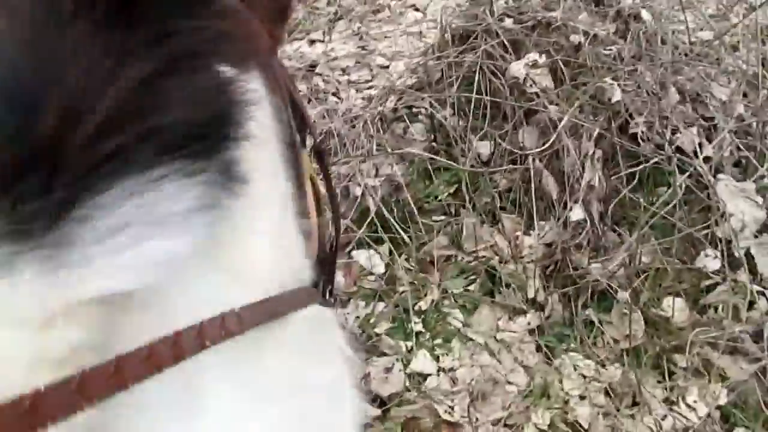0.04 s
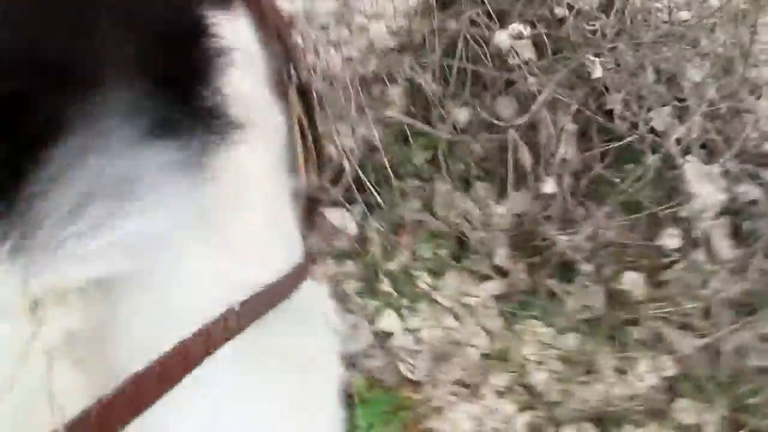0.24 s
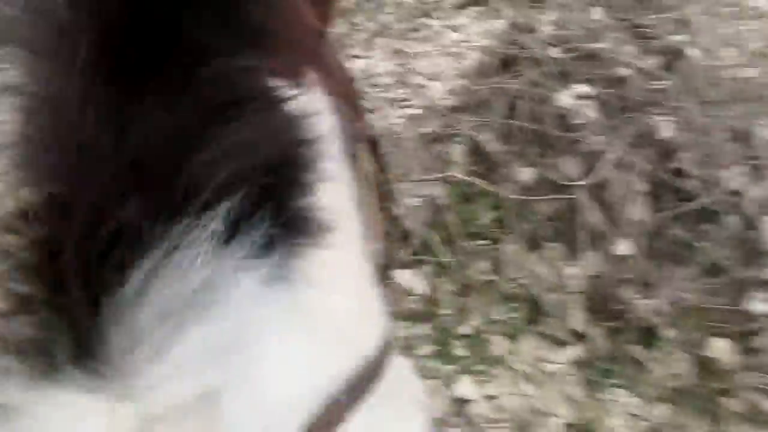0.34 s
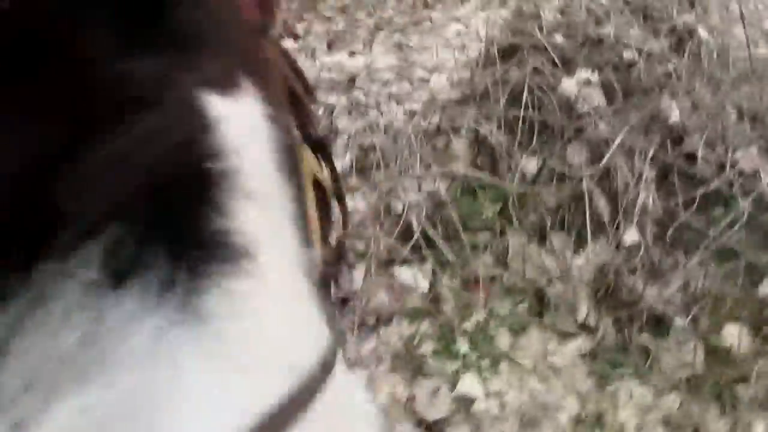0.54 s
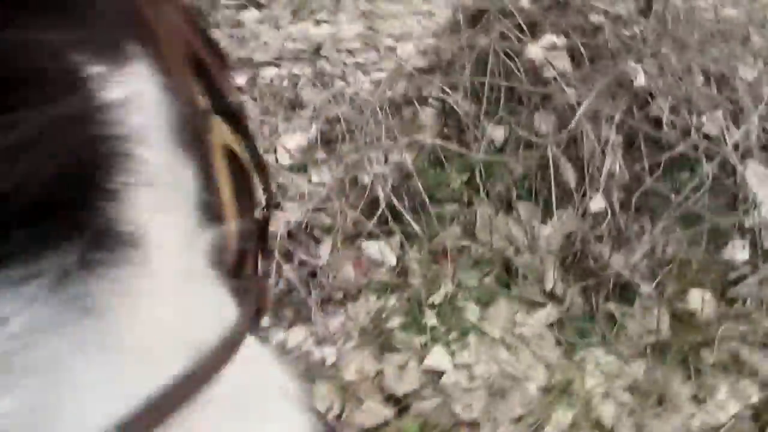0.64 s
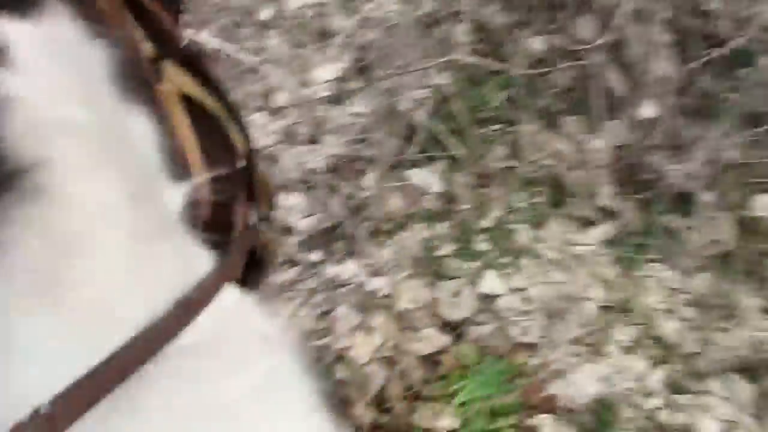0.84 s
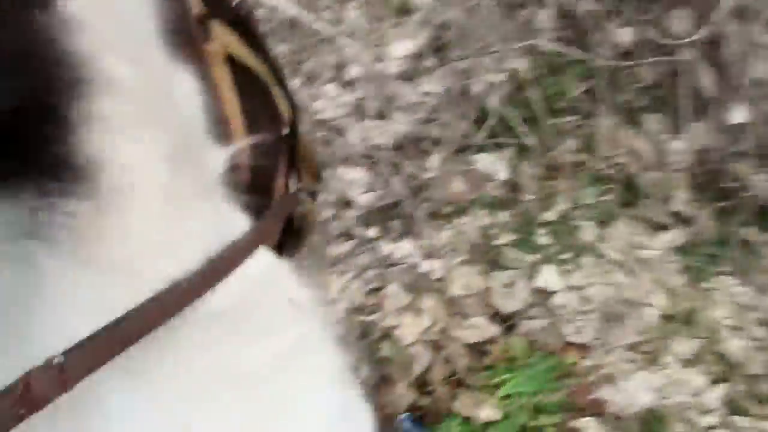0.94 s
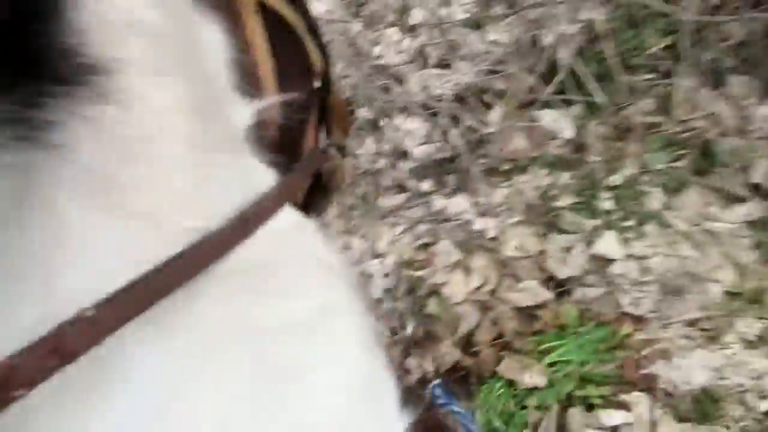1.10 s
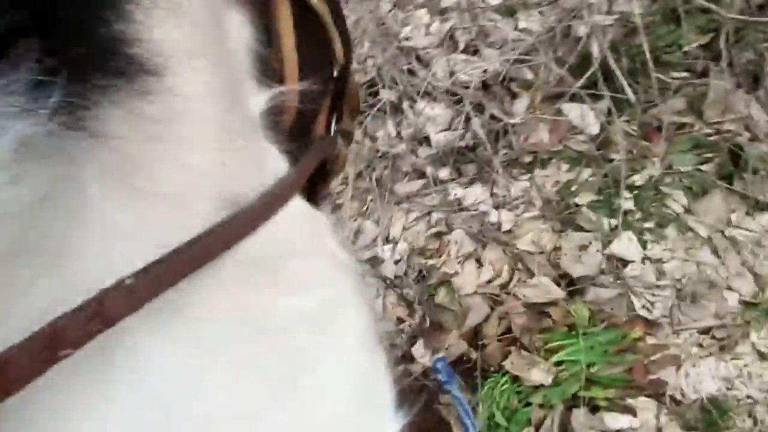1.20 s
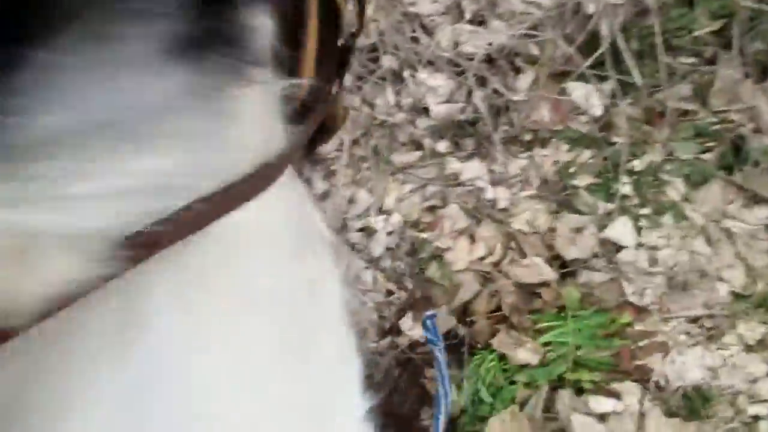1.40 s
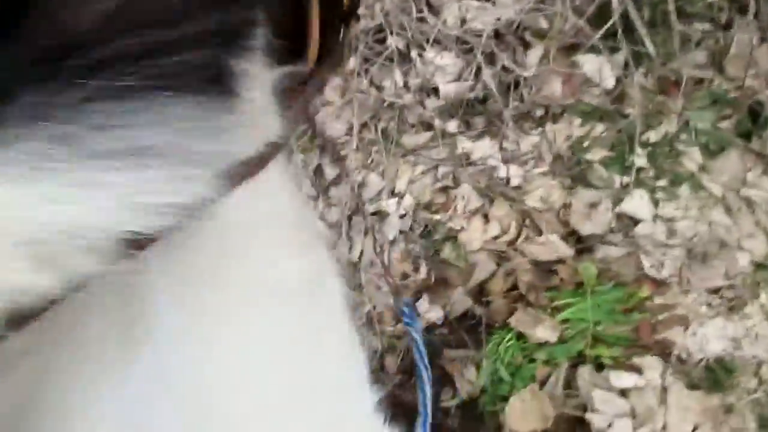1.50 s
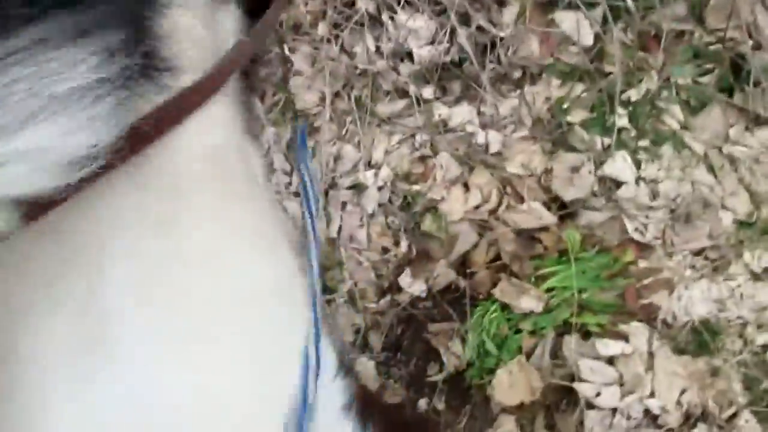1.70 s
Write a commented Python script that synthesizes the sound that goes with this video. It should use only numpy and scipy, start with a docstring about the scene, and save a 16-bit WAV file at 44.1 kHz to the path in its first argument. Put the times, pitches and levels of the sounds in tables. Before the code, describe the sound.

A horse paws at dry leaves and twigs, scraping and then stamping with a crunch.

```python
"""Horse pawing dry leaves

Heard from the saddle: twigs snap, the hoof drags through the litter, then stamps with a crunch and thud.
Dense clicks make the leaves and soil, ringing bursts the wood, damped low tones the blows on the ground.
A few soft knocks and a light rustle follow, and the brush scatters the close sounds into a faint tail.
Behind it all lies quiet outdoor air, with one thin, distant bird whistle."""
import sys
import numpy as np
from scipy import signal
from scipy.fft import rfft, irfft, next_fast_len
from scipy.io import wavfile
from scipy.ndimage import uniform_filter1d

SR = 44100
rng = np.random.default_rng(int(sys.argv[2]) if len(sys.argv) > 2 else 0)


def put_to_file(sound):
    """Save the sound as 16-bit audio at rate SR, in the file named by the first command-line argument."""
    columns = np.atleast_2d(sound).T  # one column per channel
    safe = np.clip(columns, -1, 1)
    whole_steps = np.round(safe * 32767)
    wavfile.write(sys.argv[1], SR, whole_steps.astype(np.int16))


N = 77175
TIME = np.arange(N) / SR

# Level rides for the horse's three moves: time_s, leaf_db, ground_db
HOOF_DRAG = [(.0575, -55, -56), (.0595, -35, -35), (.092, -27, -33.5), (.106, -36, -44), (.128, -39, -40),
             (.16, -32, -37), (.178, -21.5, -29), (.2, -27.5, -37.5), (.214, -23.5, -31),
             (.246, -27.5, -34), (.254, -25, -30), (.267, -26.5, -37), (.275, -22.5, -28),
             (.297, -24, -30.5), (.311, -32.5, -37), (.382, -40, -43.5), (.44, -38.5, -40.5),
             (.472, -33, -36.5), (.494, -38.5, -47), (.53, -37.5, -42.5), (.545, -47.5, -43),
             (.64, -57, -59)]
HOOF_STAMP = [(.70, -53, -55), (.726, -45, -46), (.739, -38, -30), (.742, -30.5, -30), (.76, -30.5, -28),
              (.768, -32, -32), (.783, -32, -28.5), (.81, -40, -42.5), (.85, -48, -47), (.93, -52.5, -53.5),
              (1.02, -66, -63)]
WEIGHT_SHIFT = [(1.078, -76, -73), (1.095, -79, -47.5), (1.15, -69, -63.5), (1.2, -53.5, -55.5),
                (1.29, -72, -64), (1.37, -54.5, -54.5), (1.43, -54, -49), (1.52, -46, -52),
                (1.565, -42, -56), (1.6, -45, -46.5), (1.635, -51, -64), (1.657, -53, -46),
                (1.68, -68, -42), (1.705, -56, -53.5), (1.75, -50, -50)]
# EQ curves for each move's leaves and ground, the stalks and the air: frequency_hz, relative_db
DRAG_LEAF_EQ = [(900, -24), (1600, -6.5), (1950, -14), (2250, -8.5), (2550, -2), (4300, -2), (6500, -6),
                (9000, -10), (12000, -13), (15000, -15.5)]
DRAG_GROUND_EQ = [(30, -22), (110, -27.5), (170, -10), (230, -3), (330, -1), (450, -4), (580, 2),
                  (800, -0.5), (1050, -3), (1550, -3.5), (1900, -13), (4000, -20)]
STAMP_LEAF_EQ = [(900, -26), (1800, -9), (2700, -1), (4300, 0), (6500, -5.5), (9000, -9), (12000, -10),
                 (15000, -12)]
STAMP_GROUND_EQ = [(30, -22), (100, -19.5), (250, -5), (600, 1.5), (1000, -3.5), (1500, -6.5), (2200, -9),
                   (4000, -16), (8000, -46)]
SHIFT_LEAF_EQ = [(900, -20), (2000, -7.5), (3000, -3), (4400, -0.5), (5700, -6), (9000, -5.5),
                 (12500, -7.5), (15000, -12)]
SHIFT_GROUND_EQ = [(30, -22), (150, -25), (250, -6), (350, 0), (500, 1.5), (750, 0), (1100, -1), (2000, -6),
                   (3200, -6), (5000, -17)]
STALK_EQ = [(2000, -5), (3500, -5.5), (5000, 1), (9000, -3), (11800, 0.5), (13000, -1), (15000, -4)]
AIR_EQ = [(25, -3.5), (60, -15), (140, -3), (300, -0.5), (560, 1.5), (900, -1.5), (1500, -2.5),
          (2000, -3.5), (3500, -4.5), (5500, -8.5), (8000, -12.5), (15000, -20.5)]
# Dull colour of the brush's tail: frequency_hz, relative_db
BRUSH_EQ = [(100, -15.5), (500, 1.5), (2000, -8.5), (5000, -4), (14000, -6.5)]
# Blows of hoof on ground: start_s, level_db, pitch_hz, t60_s, relative_grit_db
HOOF_THUDS = [(0.058, -50.5, 80, 0.11, 2.5), (0.544, -34, 76, 0.044, -12), (.758, -33, 160, 0.025, -11),
              (0.7696, -14, 270, 0.017, -16), (1.308, -44, 536, 0.054, 3.5),
              (1.3599, -29.5, 518, 0.018, -5)]
# Twigs snapping: start_s, level_db, centre_hz, width_hz, t60_s
TWIG_SNAPS = [(0.0209, -18.5, 6100, 6200, 0.0017), (0.2527, -18.5, 9000, 9000, 0.021),
              (.2765, -13, 7000, 10000, 0.0035), (.523, -36, 8000, 10000, 0.064),
              (.7403, -27, 2500, 4960, 0.0023), (.887, -37.5, 9100, 9000, 0.0069),
              (1.402, -35, 4430, 5000, 0.0054), (1.449, -37.5, 4500, 5000, 0.0043),
              (1.4762, -38, 4500, 4000, 0.01), (0.0367, -25, 2780, 1500, 0.0058)]
# Sticks knocking together: start_s, level_db, pitch_hz
STICK_KNOCKS = [(.0375, -38, 2210), (0.4339, -27.5, 1910), (0.5752, -35.5, 1890), (1.0775, -40, 1160),
                (1.597, -44.5, 2000)]
# Dry stalks brushing past: start_s, level_db, length_s
STALK_SWISHES = [(1.13, -39, 0.013), (1.168, -45, 0.0094)]
# Level rides for the supporting textures: time_s, level_db
STEM_SPLINTER = [(.19, -73), (.25, -42), (.285, -32.5), (.32, -43), (.38, -51), (.45, -50), (.52, -51),
                 (.6, -60)]  # stems splinter as the hoof digs deeper
HOLLOW_RUB = [(1.55, -73), (1.595, -52), (1.63, -53), (1.66, -50), (1.7, -59.5), (1.75, -53.5)]  # a low rub near the end
GRASS_SLIDE = [(1.48, -68), (1.53, -55), (1.565, -47), (1.6, -56), (1.63, -73)]  # dry grass slides past
WEIGHT_RUMBLE = [(.05, -73), (.33, -66), (.43, -74), (.5, -54), (.58, -71), (.78, -60), (.86, -73)]  # low end of the horse's moving weight
# The far bird's whistle: time_s, pitch_hz, level_db
BIRD_WHISTLE = [(.975, 5800, -71), (.99, 5600, -63), (1.03, 5750, -66), (1.06, 6050, -71),
                (1.09, 5580, -59), (1.11, 5450, -67)]

GRAINS_PER_S, GRAIN_SPREAD_DB = 2600, 3.0
FRACTURES_PER_S, FRACTURE_SPREAD_DB, FRACTURE_SHARE = 2800, 1.5, 0.48
THUD_ATTACK_S, THUD_LOW_CUT_HZ, GRIT_WIDTH_RATIO = 0.0019, 59.5, 1.47
STICK_T60_S, STICK_WIDTH_RATIO, STICK_CLICK_DB = 0.02, 0.22, -5.5
BRUSH_DB, BRUSH_T60_S, BRUSH_DELAY_S = -19, 0.58, 0.013
AIR_DB, WHINE_DB, WHINE_HZ = -51.5, -67, 1934
HIGH_CUT_HZ = 15100


def litter(move, leaf_eq, ground_eq):
    """One move of the hoof: bright leaves crackle over the duller scrape of soil and stems."""
    leaves = undb(curve(move, column=1)) * colour(crackle(), leaf_eq)
    ground = undb(curve(move, column=2)) * colour(crackle(), ground_eq)
    return gate(move) * (leaves + ground)


def crackle():
    """Leaf fragments tick, each in its own band, among sharp broadband fractures."""
    edges_hz = np.geomspace(100, 17000, 13)
    ticks = np.zeros(N)
    for low, high in zip(edges_hz, edges_hz[1:]):
        ticks += band(clicks(GRAINS_PER_S, GRAIN_SPREAD_DB), np.sqrt(low * high), high - low, order=2)
    fractures = clicks(FRACTURES_PER_S, FRACTURE_SPREAD_DB)
    return np.sqrt(1 - FRACTURE_SHARE) * unit(ticks) + np.sqrt(FRACTURE_SHARE) * fractures


def thuds():
    """The ground gives under each blow: a quickly damped tone, roughened with grit."""
    out = np.zeros(N)
    for start, db, hz, t60, grit_db in HOOF_THUDS:
        age = np.maximum(TIME - start, 0)
        body = np.sin(2 * np.pi * hz * age)
        grit = unit(band(rng.standard_normal(N), hz, hz * GRIT_WIDTH_RATIO, order=2))
        envelope = 2 * (1 - np.exp(-age / THUD_ATTACK_S)) * decay(start, t60)
        out += undb(db) * envelope * (body + undb(grit_db) * grit)
    return signal.sosfilt(signal.butter(1, THUD_LOW_CUT_HZ, "high", fs=SR, output="sos"), out)


def twigs():
    """Each snap is a short burst of breaking fibres in the twig's resonance."""
    out = np.zeros(N)
    for start, db, hz, width, t60 in TWIG_SNAPS:
        fibres = rng.choice([-1., 1.], N) * decay(start, t60)
        makeup_gain = 1 / np.sqrt(2 * width / SR)
        out += undb(db) * makeup_gain * band(fibres, hz, width)
    return out


def sticks():
    """Dry wood gives a short, rough note with a click of contact."""
    out = np.zeros(N)
    for start, db, hz in STICK_KNOCKS:
        contact = rng.choice([-1., 1.], N)
        note = unit(band(contact, hz, hz * STICK_WIDTH_RATIO, order=2)) * decay(start, STICK_T60_S)
        click = unit(band(contact, hz, hz * 2)) * decay(start, STICK_T60_S / 2)
        out += undb(db) * (note + undb(STICK_CLICK_DB) * click)
    return out


def friction(move, centre_hz, width_hz):
    """Dense catches and slips ring one broad resonance."""
    scrape = unit(band(clicks(GRAINS_PER_S, GRAIN_SPREAD_DB), centre_hz, width_hz, order=2))
    return gate(move) * undb(curve(move, column=1)) * scrape


def stalks():
    """Dry stalks brush past in brief, rounded swells of bright crackle."""
    envelope = np.zeros(N)
    for onset, db, length in STALK_SWISHES:
        position = 2 * (TIME - onset) / length - 1
        envelope += undb(db) * np.sqrt(np.maximum(1 - position ** 2, 0))
    return envelope * colour(crackle(), STALK_EQ)


def rumble():
    """The horse shifts its weight: deep, soft noise under the drag and the stamp."""
    low_end = unit(band(rng.standard_normal(N), centre_hz=50, width_hz=75, order=2))
    return undb(curve(WEIGHT_RUMBLE, column=1)) * low_end


def brush(x):
    """Trunks and undergrowth scatter a faint, duller tail."""
    tail = colour(rng.standard_normal(N), BRUSH_EQ) * decay(BRUSH_DELAY_S, BRUSH_T60_S)
    return undb(BRUSH_DB) * signal.fftconvolve(x, unit(tail) / np.sqrt(2 * N))[:N]


def bird():
    """One thin, far whistle: a gliding sine with a fast flutter in pitch."""
    hz = curve(BIRD_WHISTLE, column=1) * (1 + 0.0073 * waver(rate_hz=170))
    return gate(BIRD_WHISTLE) * undb(curve(BIRD_WHISTLE, column=2)) * tone(hz)


def air():
    """A quiet, even bed of outdoor noise with a faint, thin whine."""
    whine = tone(WHINE_HZ * (1 + 0.00177 * waver(rate_hz=35)))
    return undb(AIR_DB) * colour(rng.standard_normal(N), AIR_EQ) + undb(WHINE_DB) * whine


def undb(db):
    """Decibels to gain."""
    return 10 ** (np.asarray(db) / 20)


def unit(x):
    """Scale to rms 1."""
    return x / np.sqrt(np.mean(x ** 2) + 1e-18)


def curve(table, column):
    """One column of a table, joined by straight lines in time."""
    rows = np.array(table)
    return np.interp(TIME, rows[:, 0], rows[:, column])


def gate(table):
    """Open from a table's first time to its last."""
    return (TIME >= table[0][0]) & (TIME <= table[-1][0])


def decay(start, t60):
    """Hard attack, then a fall of 60 dB every t60 seconds."""
    return (TIME >= start) * np.exp(-np.log(1000) * np.maximum(TIME - start, 0) / t60)


def colour(x, eq):
    """Minimum-phase EQ, so clicks have no pre-ring; rms 1."""
    hz, db = np.array(eq).T
    size = next_fast_len(2 * N)
    bins_hz = np.maximum(np.fft.rfftfreq(size, 1 / SR), 1)
    gain = undb(np.interp(np.log(bins_hz), np.log(hz), db))
    cepstrum = irfft(np.log(gain), size)
    cepstrum[1:size // 2] *= 2
    cepstrum[size // 2 + 1:] = 0
    return unit(irfft(rfft(x, size) * np.exp(rfft(cepstrum)), size)[:N])


def band(x, centre_hz, width_hz, order=1):
    """Band-pass around a geometric centre."""
    low = np.hypot(centre_hz, width_hz / 2) - width_hz / 2
    high = min(low + width_hz, SR * .48)
    return signal.sosfilt(signal.butter(order, [low, high], "band", fs=SR, output="sos"), x)


def clicks(per_s, spread_db):
    """Random clicks, mostly small and a few large; rms 1."""
    hits = rng.random(N) < per_s / SR
    size = np.minimum(rng.exponential(size=N), 4.5)
    sign = rng.choice([-1, 1], N)
    return unit(hits * sign * undb(spread_db * size))


def tone(hz):
    """A sine that follows a pitch curve; rms 1."""
    return np.sqrt(2) * np.sin(2 * np.pi * np.cumsum(hz) / SR)


def waver(rate_hz):
    """Smooth random modulation; rms 1."""
    size = int(SR / rate_hz)
    return unit(uniform_filter1d(uniform_filter1d(rng.standard_normal(N), size), size))


def scene():
    """Mono mix: the close foley feeds the brush; rumble, bird and air stay dry."""
    drag = litter(HOOF_DRAG, DRAG_LEAF_EQ, DRAG_GROUND_EQ)
    stamp = litter(HOOF_STAMP, STAMP_LEAF_EQ, STAMP_GROUND_EQ)
    shift = litter(WEIGHT_SHIFT, SHIFT_LEAF_EQ, SHIFT_GROUND_EQ)
    stems = friction(STEM_SPLINTER, centre_hz=1890, width_hz=500)
    rub = friction(HOLLOW_RUB, centre_hz=349, width_hz=87)
    grass = friction(GRASS_SLIDE, centre_hz=4370, width_hz=900)
    close = drag + stamp + shift + stems + rub + grass + twigs() + sticks() + stalks() + thuds()
    return (close + brush(close) + rumble() + bird() + air())[None]


def record(dry):
    """A steep high cut trims the very top of the mix."""
    return signal.sosfilt(signal.ellip(10, .2, 80, HIGH_CUT_HZ, fs=SR, output="sos"), dry)


dry = scene()
out = record(dry)
put_to_file(out)
```